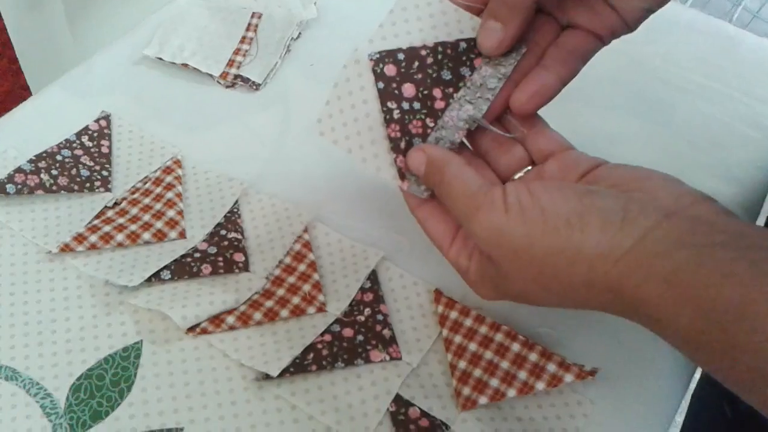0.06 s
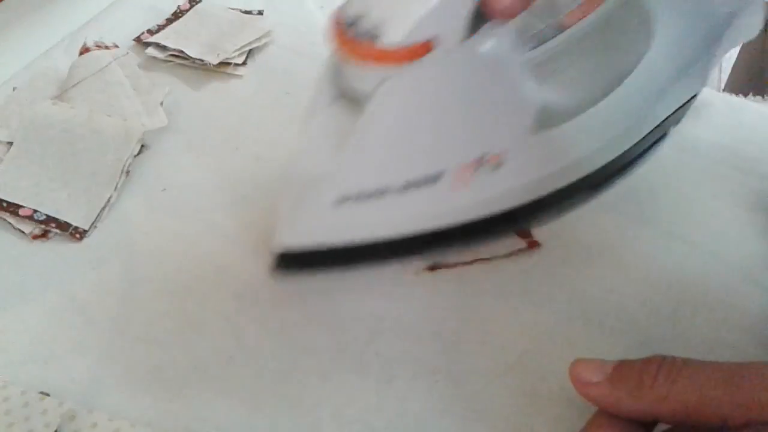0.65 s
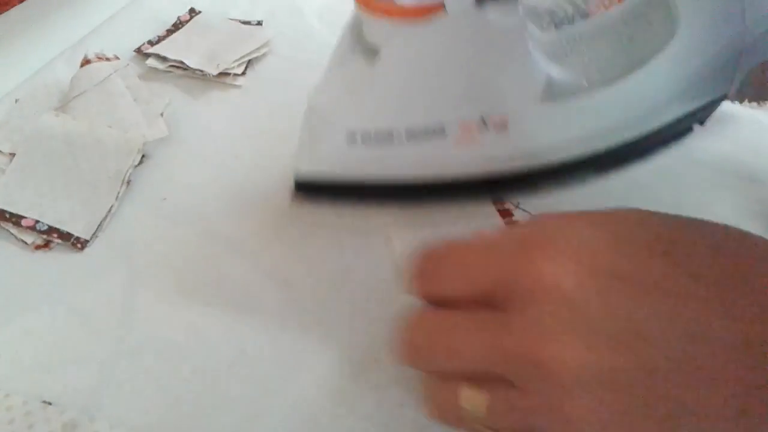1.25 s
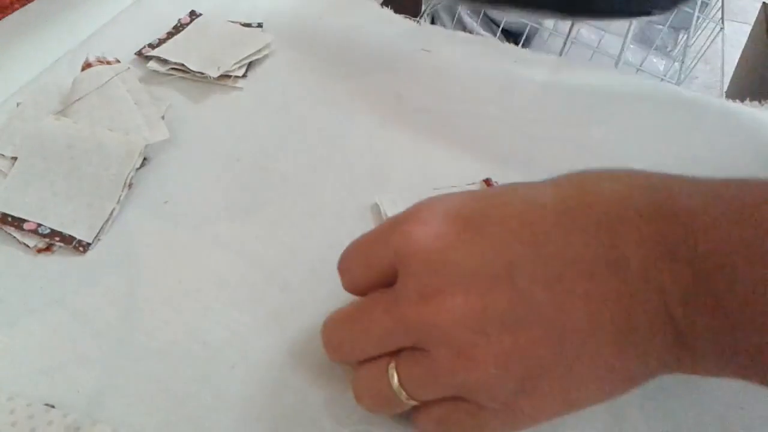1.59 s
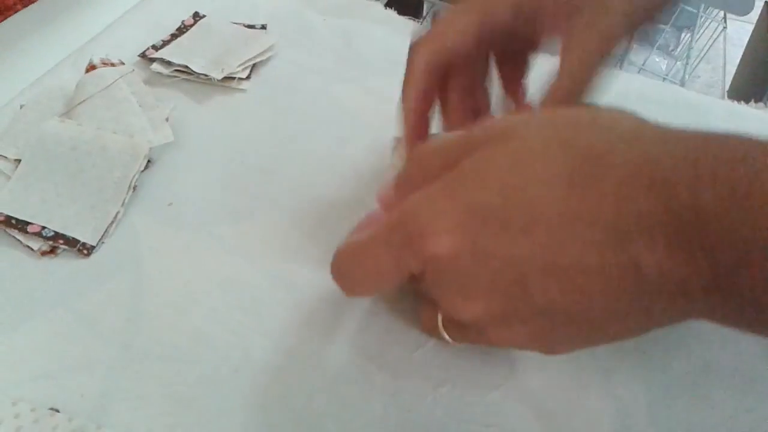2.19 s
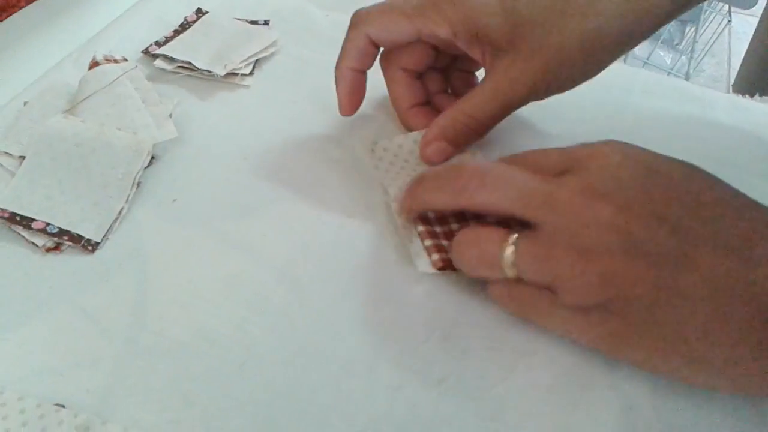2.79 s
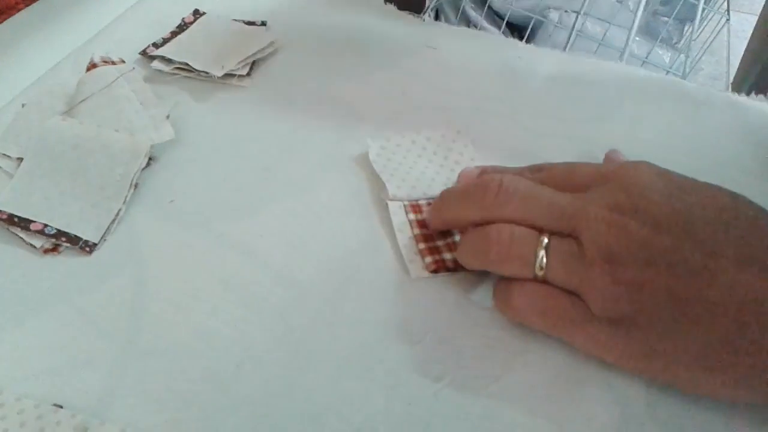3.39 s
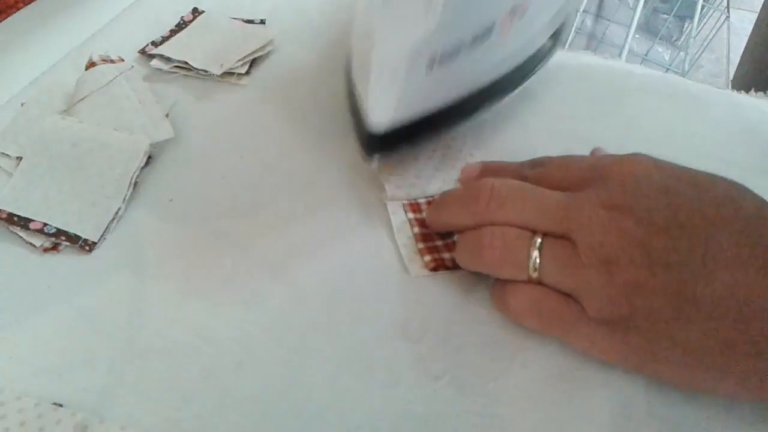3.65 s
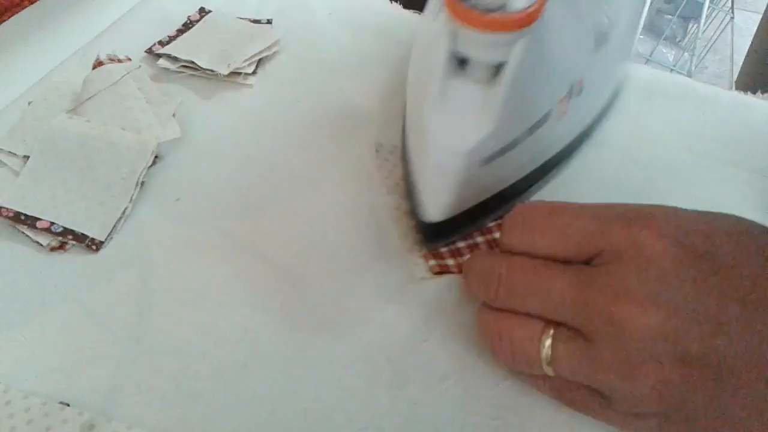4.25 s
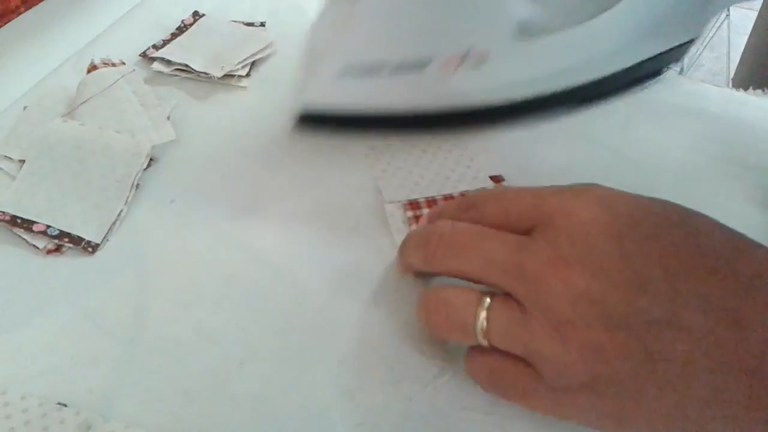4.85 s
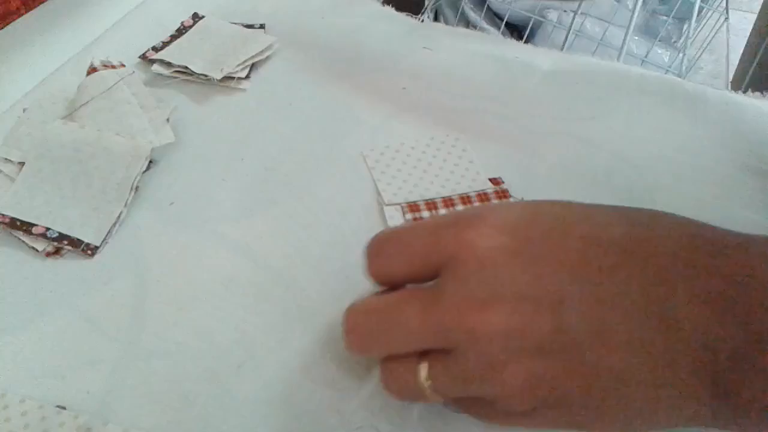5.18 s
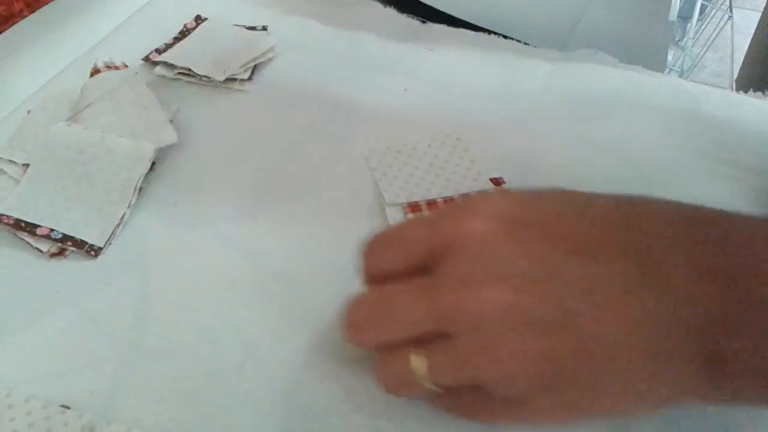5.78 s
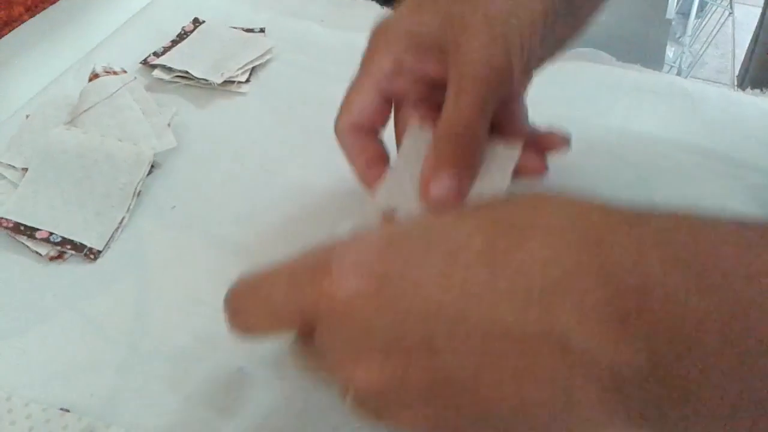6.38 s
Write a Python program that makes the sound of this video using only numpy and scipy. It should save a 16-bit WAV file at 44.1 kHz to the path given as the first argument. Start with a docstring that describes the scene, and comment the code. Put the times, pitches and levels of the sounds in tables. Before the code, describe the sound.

An iron slides over cotton with a soft hiss and low rumble, its thermostat snapping once at the start. It clatters into a metal rest, and fingers faintly rustle the cloth. After a few knocks and wire pings, the iron lands on the padded board for a second stroke, then skids into the rest with a brief squeak and a louder clatter. Everything is close, in a small hard room.

```python
"""Pressing patchwork on an ironing board.

An iron hisses over cotton twice and each time clatters back into its metal rest.
The padded board knocks and booms under it, the thermostat snaps once, and fingers
rustle the cloth after each stroke, all close by in a small hard room."""
import sys
import numpy as np
from scipy import signal
from scipy.fft import rfft, irfft
from scipy.io import wavfile
from scipy.ndimage import uniform_filter1d

SR = 44100
rng = np.random.default_rng(int(sys.argv[2]) if len(sys.argv) > 2 else 0)


def unload_audio(sound):
    """Save the sound as a 16-bit wav file, at the path given as the first command line argument."""
    columns = np.transpose(np.atleast_2d(sound))
    # keep every value between -1 and 1, then stretch to whole-number steps
    steps = np.round(np.clip(columns, -1, 1) * 32767)
    wavfile.write(sys.argv[1], SR, steps.astype(np.int16))


N = 283122

# Spectra. Each row: frequency in Hz, relative density in dB.
AIR_SPECTRUM = [(20, -23), (55, -2), (140, 0), (250, -6.5), (320, -1.5), (430, -13.5), (640, -7),
                (1100, -17), (4300, -25), (5600, -13.5), (7100, -26)]
HISS_SPECTRUM = [(240, -28), (400, -7.5), (670, -1.5), (816, -8), (2290, -14), (3770, -9.5), (4460, -4.5),
                 (5850, 8), (8300, -20), (15000, -23)]
RUMBLE_SPECTRUM = [(20, -25), (60, 1.5), (140, -4.5), (230, -7.5), (330, 3.5), (650, -30), (1200, -27.5)]
RASP_SPECTRUM = [(1500, -44), (3400, 1), (4600, 5), (8000, 5), (11000, -20)]
TICK_SPECTRUM = [(2000, -20.5), (3500, -19), (4700, -9.5), (5450, 0), (6000, -6.5), (6700, -16),
                 (10000, -34.5), (15000, -50)]
CLANG_SPECTRUM = [(250, -20), (500, 11), (1100, 8.5), (1700, -3), (4600, 0.5), (7500, -16), (12000, -43)]
KNOCK_SPECTRUM = [(150, -32), (350, -6.5), (600, -3.5), (800, -1.5), (1030, -6), (1400, -14.5), (2500, -23),
                  (5000, -58)]
BOOM_SPECTRUM = [(20, -24.5), (140, 1.5), (215, -8), (330, 3), (500, -6), (1000, -34), (3000, -48)]
SNAP_SPECTRUM = [(220, -44), (340, 14), (1500, 5.5), (2600, -6.5), (4300, 1.5), (5700, 8.5), (7500, -8),
                 (14000, -63)]
SEAM_SPECTRUM = [(500, 7.5), (1700, -2.5), (2400, -1), (4800, 8), (14000, -38)]
ROOM_SPECTRUM = [(150, 2), (480, 1), (830, 0.5), (1300, 4.5), (4700, -3), (5450, -5.5), (6200, -3)]

# Room drone. Each row: frequency in Hz, width in Hz, level in dB.
AIR_DRONES = [(132, 12, -74), (318, 38, -69.5)]
# Room decay. Each row: frequency in Hz, T60 in seconds.
ROOM_DECAY = [(200, 1), (1000, 0.56), (3000, 0.68), (6000, 0.49), (14000, 0.88)]
# Reflections off shell and board. Each row: delay in seconds, gain in dB.
REFLECTIONS = [(.0031, -25.5), (.0056, -14)]
# Bright ring modes near 5.5 kHz. Each row: frequency in Hz, relative level in dB.
BRIGHT_RING_MODES = [(4480, -13), (4830, -9), (5400, -1), (5630, -2), (5850, -6), (6220, -11), (7200, -17)]
# Plastic shell modes. Each row: ratio to the tock's pitch, relative level in dB.
SHELL_MODES = [(0.529, -13), (0.792, -13), (1, -0.5)]
# Modes of rest and board frame, then of the rest's wires.
# Each row: frequency in Hz, relative level in dB, T60 in seconds.
FRAME_MODES = [(134, -10, .6), (157, -9, .6), (334, -1, .42), (346, 0, .4), (442, -3, .3), (505, 1, .36),
               (614, 0, .3), (1114, 0, .28), (2580, 6, .6), (2705, 2, .6), (3505, 3, .33)]
WIRE_MODES = [(515, -11, .2), (1240, -10, .17), (3100, -7, .12), (4620, 1, .045), (4760, -1, .11),
              (6220, -1, .05)]

# Event levels below are relative.
# Iron on cotton. Each row: start and end in seconds, hiss and rumble in dB.
STROKES = [(0.103, 1.317, -51, -53.5), (3.604, 4.887, -51.5, -56)]
# Hand speeds up and leans. Each row: peak in seconds, added hiss and rumble in dB, length in seconds.
SWEEPS = [(0.28, -68, -70, 0.53), (0.643, -48.5, -71.5, 0.64), (0.997, -50.5, -64.5, 0.53),
          (1.232, -56, -70, 0.24), (4.68, -56, -91, 1)]
# Hits on pad or rest; the first row is a short click just as the background rises. Each row: time in seconds,
# tick and knock in dB.
PAD_HITS = [(0.111, -35, -51), (1.199, -45.5, -36), (3.035, -31, -34.5), (3.064, -34.5, -37.5),
            (3.606, -22, -28.5), (3.663, -31.5, -31), (3.769, -40.5, -38.5), (4.854, -27, -44),
            (4.876, -30, -37), (5.139, -36.5, -46.5)]
REST_HITS = [(1.573, -7.5, -41), (1.6107, -15, -41), (1.642, -8.5, -30), (1.663, -21, -30.5),
             (1.687, -16.5, -23.5), (1.726, -21.5, -36), (5.153, -25.5, -34.5), (5.165, -29, -29.5),
             (5.262, -13.5, -48), (5.2661, -26, -21.5), (5.311, -18.5, -54.5), (5.408, -14, -33),
             (5.4649, -15, -19.5), (5.474, -17.5, -21.5), (5.487, -15, -19), (5.5059, -2.5, -19),
             (5.527, -5, -22)]
# Board thuds, seam scrapes, wire pings. Each row: time in seconds, level in dB.
THUDS = [(0.152, -48.5), (1.663, -45), (3.06, -53.5), (5.204, -47), (5.267, -41), (5.293, -38.5),
         (5.509, -33), (5.535, -33), (5.858, -48.5)]
SEAMS = [(0.508, -44), (0.622, -46), (1.009, -43.5), (4.044, -53.5)]
PINGS = [(3.349, -33), (3.484, -29)]
# Shell tocks. Each row: time in seconds, level in dB, pitch in Hz.
TOCKS = [(1.2, -39, 804), (1.618, -26.5, 774), (1.653, -24, 765), (1.748, -31.5, 853), (3.065, -34, 822),
         (3.608, -24, 805), (3.6215, -28, 799), (3.716, -34.5, 760), (4.185, -41, 713), (4.79, -38.5, 704),
         (4.877, -31.5, 815), (5.467, -20, 791), (5.489, -20.5, 840), (5.531, -21, 817), (5.618, -29, 860),
         (5.66, -33.5, 683)]
# Finger rubs. Each row: middle in seconds, level in dB, length in seconds.
RUBS = [(2.048, -65.5, 0.16), (2.4, -68.5, 0.3), (2.663, -68, 0.19), (5.868, -59, 0.36), (6.1, -67, 0.12)]
# Skid into the rest. Each row: time in seconds, level in dB, squeak pitch in Hz.
SKID_CURVE = [(5.331, -46, 6060), (5.336, -29.5, 5850), (5.35, -23.5, 5650), (5.359, -29, 5570),
              (5.367, -30.5, 5520), (5.377, -31, 5690), (5.387, -33, 5570), (5.398, -26.5, 5570),
              (5.407, -35, 5700)]


def amp(db):
    """Decibels to gain."""
    return 10 ** (np.asarray(db) / 20)


def unit(x):
    """Scale to rms 1."""
    return x / np.sqrt(np.mean(x ** 2) + 1e-20)


def read(points, hz):
    """Interpolate on a log-frequency axis."""
    table_hz, value = np.transpose(points)
    return np.interp(np.log(hz + 1), np.log(table_hz + 1), value)


def level(curve):
    """Gain along a dB curve, silent outside it."""
    at_s, db = np.transpose(curve)[:2]
    return amp(np.interp(np.arange(N) / SR, at_s, db, left=-150, right=-150))


def add(mix, at_s, sound):
    """Mix in place."""
    part = mix[round(at_s * SR):][:len(sound)]
    part += sound[:len(part)]


def colour(x, spectrum, size=4096):
    """Causal filter with the given spectrum."""
    log_gain = np.log(amp(read(spectrum, abs(np.fft.fftfreq(size, 1 / SR)))))
    taps = np.fft.ifft(np.exp(np.conj(signal.hilbert(log_gain)))).real
    return signal.fftconvolve(x, taps[:size // 2])[:len(x)]


def noise(spectrum):
    """Coloured noise, rms 1."""
    return unit(colour(rng.standard_normal(N), spectrum))


def whistle(hz, width_hz):
    """Noise in a steep resonance that may glide."""
    pole = np.exp(-np.pi * width_hz / SR)
    white = rng.standard_normal(N) + 1j * rng.standard_normal(N)
    drift = signal.lfilter([1 - pole], [1, -2 * pole, pole * pole], white)
    carrier = np.exp(2j * np.pi * np.cumsum(hz * np.ones(N)) / SR)
    return unit((drift * carrier).real)


def wander(rate_hz):
    """Random line, rms 1, with rate_hz knots a second."""
    knots = rng.standard_normal(N // 20)
    return unit(np.interp(np.arange(N) / SR * rate_hz, np.arange(len(knots)), knots))


def friction(spectrum, snags_per_s, spread_db, snag_gain):
    """Dense tiny slips plus sparse snags, rms 1."""
    snags = (rng.random(N) < snags_per_s / SR) * rng.standard_normal(N)
    snags *= amp(spread_db * np.minimum(rng.exponential(1, N), 4))
    return unit(colour(rng.standard_normal(N) + snag_gain * unit(snags), spectrum))


def envelope(t, t60_s, rise_s):
    """Exponential rise and decay."""
    return (1 - np.exp(-t / rise_s)) * amp(-60 * t / t60_s)


def burst(spectrum, t60_s, rise_s, bounce_gain=0, bounce_s=.005, size=6000):
    """One contact: dying chatter, optional rebound, strongest 5 ms near rms 1."""
    t = np.arange(size) / SR
    rebound = bounce_gain * (t > bounce_s) * amp(-60 * abs(t - bounce_s) / t60_s)
    shape = envelope(t, t60_s, rise_s) + rebound
    phase = np.angle(rfft(shape * rng.standard_normal(size)))
    chatter = irfft(np.exp(1j * phase), size) * np.sqrt(shape)  # a hard blow excites all pitches alike
    peak_power = uniform_filter1d(shape ** 2, size=220, mode="constant").max()
    return unit(colour(chatter, spectrum)) * np.sqrt(np.mean(shape ** 2) / peak_power)


def ringing(modes):
    """Free decay of struck modes."""
    t = np.arange(SR) / SR
    return sum(amp(db - 60 * t / t60_s) * np.sin(2 * np.pi * hz * t) for hz, db, t60_s in modes)


def air(noise_db=-62.5, hush_db=-6, hush_end_s=.11):
    """Room noise and a faint wavering drone, quieter for the first instant."""
    drone = sum(amp(db) * whistle(hz, width_hz) for hz, width_hz, db in AIR_DRONES)
    hush = amp(hush_db * (np.arange(N) / SR < hush_end_s))
    return hush * (amp(noise_db) * noise(AIR_SPECTRUM) + drone)


def stroke_gains(grip_s=.048, press_db=16.5, press_s=.047, lift_db_per_s=428, relax_db_per_s=168):
    """Slide, push and lean: the iron lands hard, grips, sweeps and lifts; the board relaxes."""
    t = np.arange(N) / SR
    hurry, lean, slide, push = np.zeros((4, N))
    for peak_s, hiss_db, rumble_db, length_s in SWEEPS:
        arch = np.hanning(round(length_s * SR))
        add(hurry, peak_s - length_s / 2, amp(hiss_db) * arch)
        add(lean, peak_s - length_s / 2, amp(rumble_db) * arch)
    for start_s, end_s, hiss_db, rumble_db in STROKES:
        down_s, lifted_s = np.maximum(t - start_s, 0), np.maximum(t - end_s, 0)
        grip = 1 - np.exp(-down_s / grip_s)
        landing_db = press_db * np.exp(-down_s / press_s)
        slide += grip * (amp(hiss_db) + hurry) * amp(-lift_db_per_s * lifted_s)
        push += grip * (amp(rumble_db + landing_db) + lean) * amp(-relax_db_per_s * lifted_s)
    return slide, push, lean


def ironing(slide, push, lean):
    """The soleplate hisses on the weave; the board rumbles, and judders as the hand leans."""
    hiss = friction(HISS_SPECTRUM, snags_per_s=500, spread_db=3.5, snag_gain=.45)
    hiss *= amp(.8 * wander(70))
    rumble = noise(RUMBLE_SPECTRUM)
    judder_hz = 133 + 4 * wander(22.85)
    judder = np.sin(2 * np.pi * np.cumsum(judder_hz) / SR) * amp(13.5 + 2 * wander(19.1))
    return slide * hiss + amp(-4) * push * rumble + lean * judder


def rasp(slide):
    """The weave rasps more widely when the plate moves fast."""
    grain = friction(RASP_SPECTRUM, snags_per_s=260, spread_db=-3, snag_gain=.59)
    return amp(-11.5 + 4.8 * wander(12)) * grain * slide ** 2 / slide.max()


def clack(tick_db, clang_db, mode_count=40):
    """Hard contact: a tick, a narrow bright ring near 5.5 kHz and a clang that differs from spot to spot."""
    t = np.arange(6000) / SR
    root_hz = np.linspace(np.sqrt(350), np.sqrt(9500), mode_count)
    clang_hz = (root_hz + rng.uniform(-.65, .45, mode_count)) ** 2
    spot = np.exp(2j * np.pi * rng.random(mode_count)) * amp(4 * rng.standard_normal(mode_count))
    weight = spot * amp(read(CLANG_SPECTRUM, clang_hz)) * clang_hz ** .51
    partials = np.cos(2 * np.pi * clang_hz[:, None] * t + np.angle(weight)[:, None])
    clang = unit(abs(weight) @ partials) * envelope(t, t60_s=.068, rise_s=.00082)
    bright_ring = np.zeros(len(t))
    for hz, db in BRIGHT_RING_MODES:
        detuned_hz = hz * (1 + .012 * rng.standard_normal())
        bright_ring += amp(db) * np.sin(2 * np.pi * (detuned_hz * t + rng.random()))
    bright_ring *= envelope(t, t60_s=.035, rise_s=.0008)
    tick = burst(TICK_SPECTRUM, t60_s=.028, rise_s=.0004, bounce_gain=.22, bounce_s=.0052)
    return amp(tick_db) * (amp(-7) * bright_ring + amp(-12) * tick) + amp(clang_db) * clang


def knock(db):
    """The iron's weight lands: a dull thump and a slower boom of the board."""
    thump = amp(-9.5) * burst(KNOCK_SPECTRUM, t60_s=.044, rise_s=.0018)
    boom = amp(-27) * burst(BOOM_SPECTRUM, t60_s=.14, rise_s=.0068)
    return amp(db) * (thump + boom)


def blows(clang_db_per_tick_db=.41, knock_lag_s=.00203):
    """Each hit clacks, then the board gives. Metal clangs; padding hardly does."""
    clacks, knocks = np.zeros((2, N))
    for hits, surface_db in (REST_HITS, -25.5), (PAD_HITS, -43.5):
        for at_s, tick_db, knock_db in hits:
            add(clacks, at_s, clack(tick_db, surface_db + clang_db_per_tick_db * tick_db))
            add(knocks, at_s + knock_lag_s, knock(knock_db))
    return clacks, knocks


def reflected(x):
    """Close reflections make a sound hollow."""
    out = x.copy()
    for delay_s, db in REFLECTIONS:
        add(out, delay_s, amp(db) * x)
    return out


def frame(x):
    """The rest and the board's legs ring on after each blow."""
    return amp(-56.5) * signal.fftconvolve(x, ringing(FRAME_MODES))[:N]


def room(x, build_s=.0033):
    """Diffuse tail, each band dying at its own rate."""
    hz, t, bands = signal.stft(rng.standard_normal(SR), SR, nperseg=256)
    decay = amp(-60 * t / read(ROOM_DECAY, hz)[:, None])
    tail = signal.istft(bands * decay, SR, nperseg=256)[1]
    tail *= 1 - np.exp(-np.arange(len(tail)) / SR / build_s)
    return signal.fftconvolve(colour(x, ROOM_SPECTRUM), tail / np.linalg.norm(tail))[:N]


def thuds():
    """The board booms softly under the weight of iron or hand."""
    out = np.zeros(N)
    for at_s, db in THUDS:
        boom = burst(BOOM_SPECTRUM, t60_s=.29, rise_s=.0057)
        thump = burst(KNOCK_SPECTRUM, t60_s=.33, rise_s=.00243)
        add(out, at_s, amp(db) * (boom + amp(-3.5) * thump))
    return out


def thermostat(at_s=.2188, db=-28.5):
    """One short snap inside the iron."""
    out = np.zeros(N)
    add(out, at_s, amp(db) * burst(SNAP_SPECTRUM, t60_s=.048, rise_s=.00011))
    return out


def seams():
    """The plate scrapes over seams."""
    out = np.zeros(N)
    for at_s, db in SEAMS:
        add(out, at_s, amp(db) * burst(SEAM_SPECTRUM, t60_s=.16, rise_s=.001))
    return out


def tocks():
    """The iron's plastic shell rings hollow over a knock as its weight settles."""
    out, t = np.zeros(N), np.arange(6000) / SR
    swell = 2 * envelope(t, t60_s=.042, rise_s=.0031)
    for at_s, db, hz in TOCKS:
        shell = sum(amp(mode_db) * np.sin(2 * np.pi * ratio * hz * t) for ratio, mode_db in SHELL_MODES)
        add(out, at_s, amp(db) * swell * shell + knock(db - .5))
    return out


def finger_rubs():
    """Fingertips brush the cotton in small uneven rubs."""
    gain = np.zeros(N)
    for middle_s, db, length_s in RUBS:
        add(gain, middle_s - length_s / 2, amp(db) * np.sqrt(np.hanning(round(length_s * SR))))
    rub = friction(HISS_SPECTRUM, snags_per_s=90, spread_db=3.5, snag_gain=.6)
    rub *= amp(1.3 * wander(35))
    pad = noise(KNOCK_SPECTRUM)
    return gain * (amp(2) * rub + amp(-5) * pad)


def pings(lead_s=.002):
    """The lifted iron grazes the rest and leaves its wires ringing."""
    out = np.zeros(N)
    for at_s, db in PINGS:
        tick = burst(TICK_SPECTRUM, t60_s=.047, rise_s=.0025, bounce_gain=.077, bounce_s=.035)
        clang = burst(CLANG_SPECTRUM, t60_s=.12, rise_s=.0021, bounce_gain=.08, bounce_s=.023)
        add(out, at_s - lead_s, amp(db - 8.5) * tick + amp(db - 15) * clang)
        add(out, at_s, amp(db - 12) * ringing(WIRE_MODES))
    return out


def skid():
    """Metal sticks and slips on metal: a rough falling squeak over a scrape."""
    at_s, _, hz = np.transpose(SKID_CURVE)
    squeak_hz = np.interp(np.arange(N) / SR, at_s, hz)
    squeak = whistle(squeak_hz, width_hz=480) * amp(3 * wander(150))
    scrape = friction(CLANG_SPECTRUM, snags_per_s=670, spread_db=-6.5, snag_gain=.46)
    return level(SKID_CURVE) * (amp(-5) * squeak + amp(-13) * scrape)


def groan(pitch_hz=512):
    """The rest groans near one of its modes while the iron skids."""
    phase = 2 * np.pi * np.cumsum(pitch_hz + 7 * wander(220)) / SR
    tone = np.sin(phase) + amp(-14) * np.sin(2 * phase)
    return level(SKID_CURVE) * tone * amp(-7.5 + wander(112))


def scene():
    """Mono mix: cloth sounds stay dry; blows ring the frame and the room."""
    clacks, knocks = blows()
    sharp = reflected(clacks) + skid()
    dull = knocks + tocks() + thuds()
    wires = reflected(pings())
    snap = thermostat()
    direct = sharp + dull + groan() + wires + snap + frame(amp(-6) * sharp + amp(-1) * dull)
    echo = room(amp(-4.5) * sharp + amp(-3.5) * wires + amp(-9.5) * (dull + snap))
    slide, push, lean = stroke_gains()
    cloth = ironing(slide, push, lean) + rasp(slide) + seams() + finger_rubs()
    return (direct + echo + cloth + air())[None]


def record(dry):
    """Soft-clip the hardest peaks, then low-pass."""
    ceiling, cutoff_hz = .65, 15250
    rounded = ceiling * np.tanh(dry / ceiling)
    lowpass = signal.firwin(511, cutoff_hz, window=("kaiser", 9), fs=SR)
    return signal.oaconvolve(rounded, lowpass[None], "same")


dry = scene()
out = record(dry)
unload_audio(out)
```